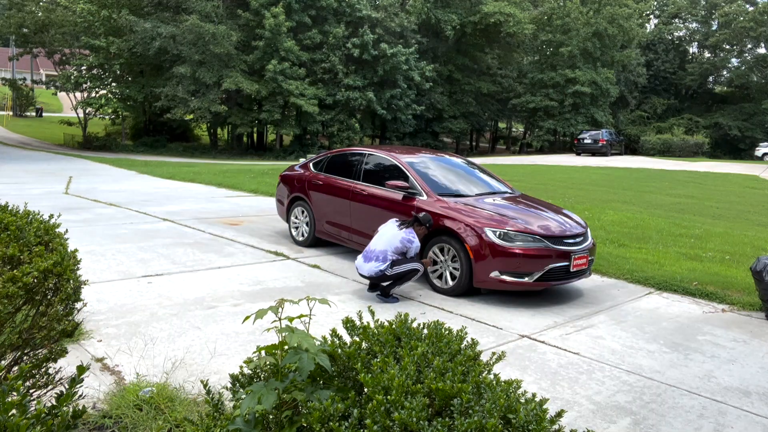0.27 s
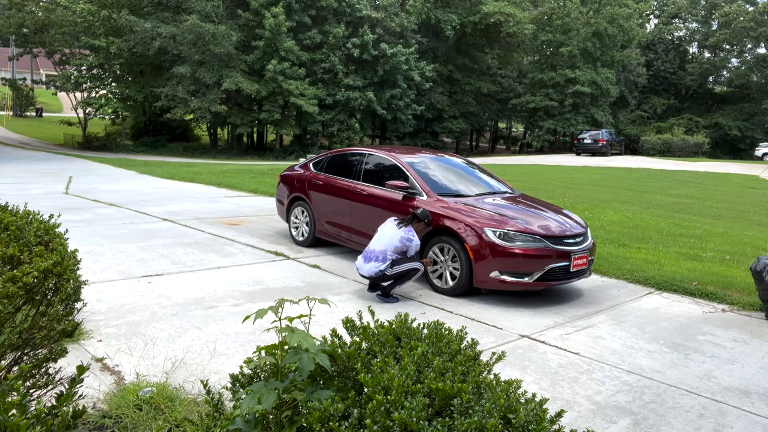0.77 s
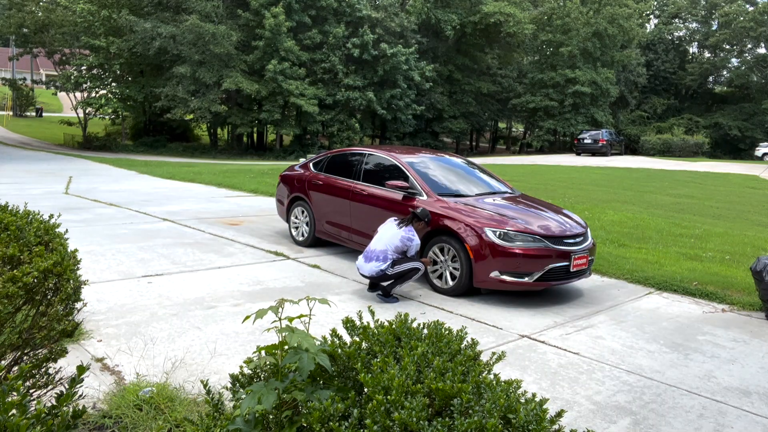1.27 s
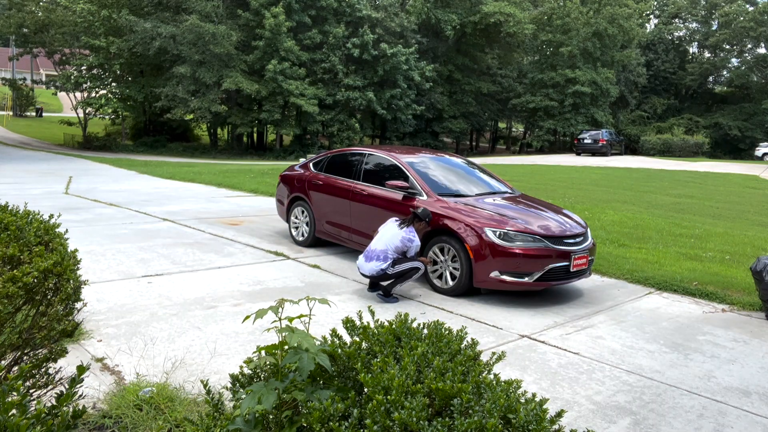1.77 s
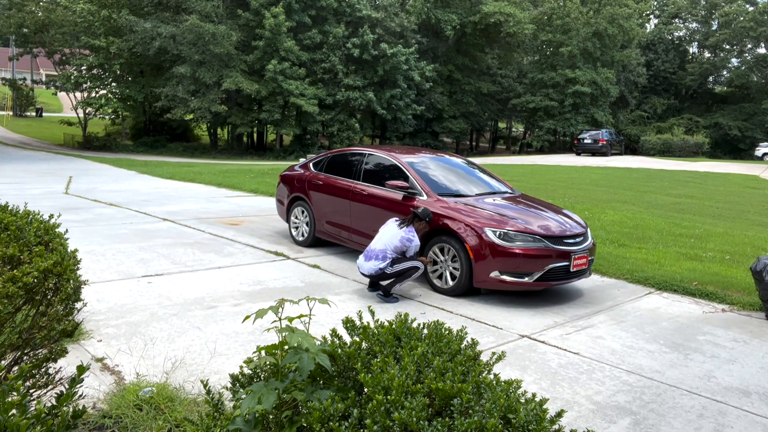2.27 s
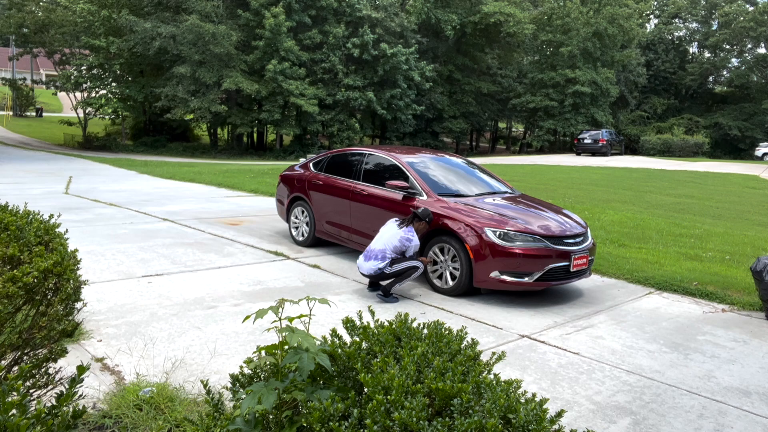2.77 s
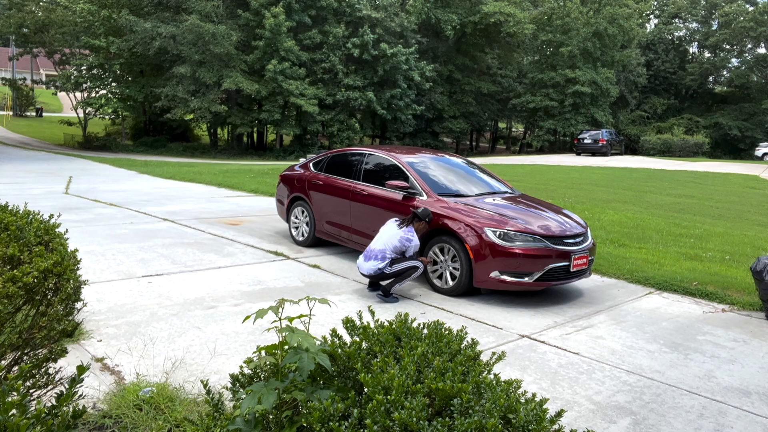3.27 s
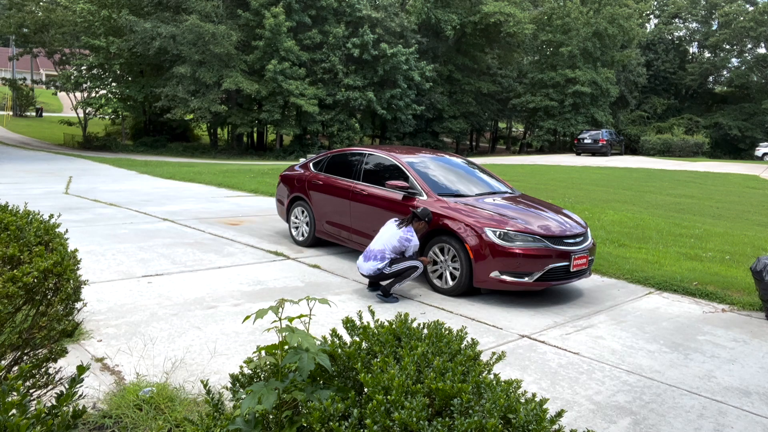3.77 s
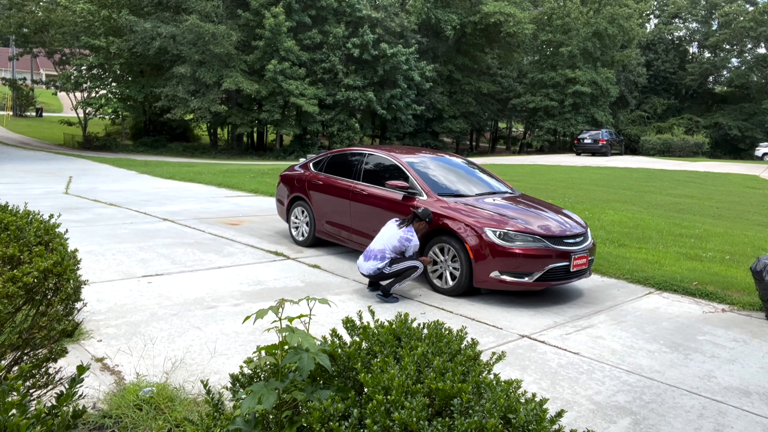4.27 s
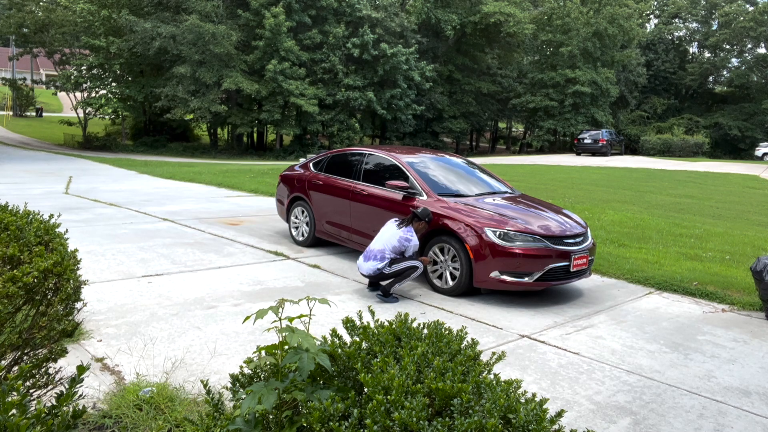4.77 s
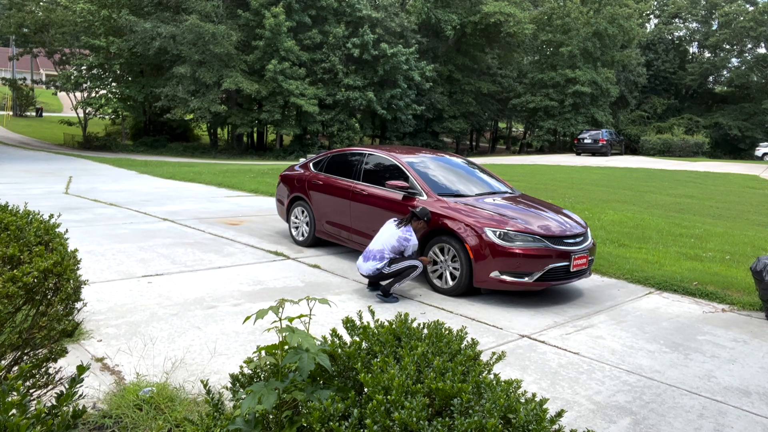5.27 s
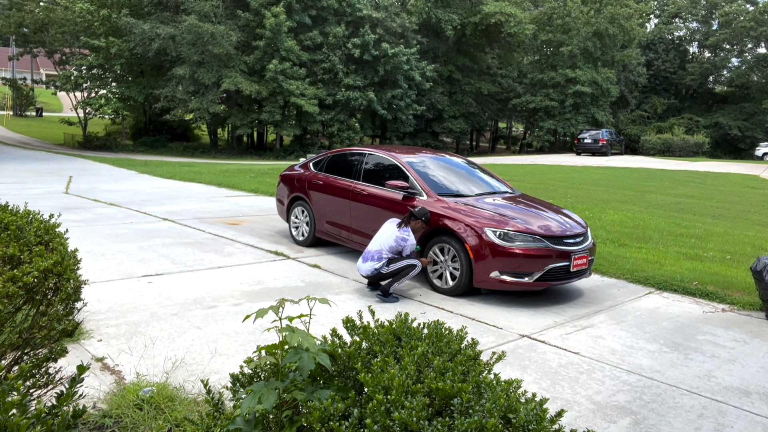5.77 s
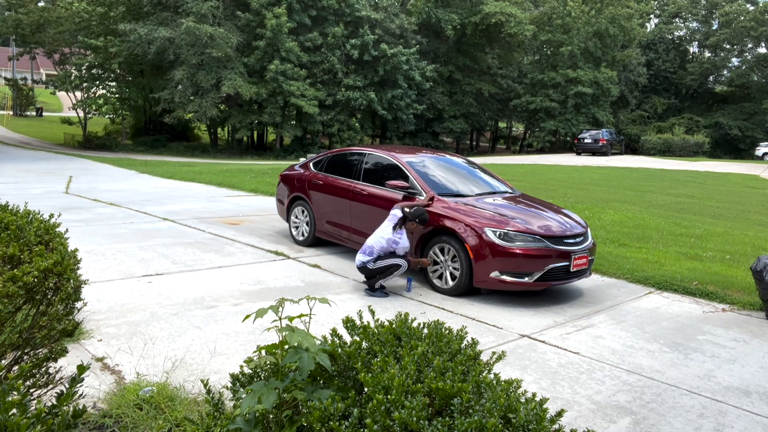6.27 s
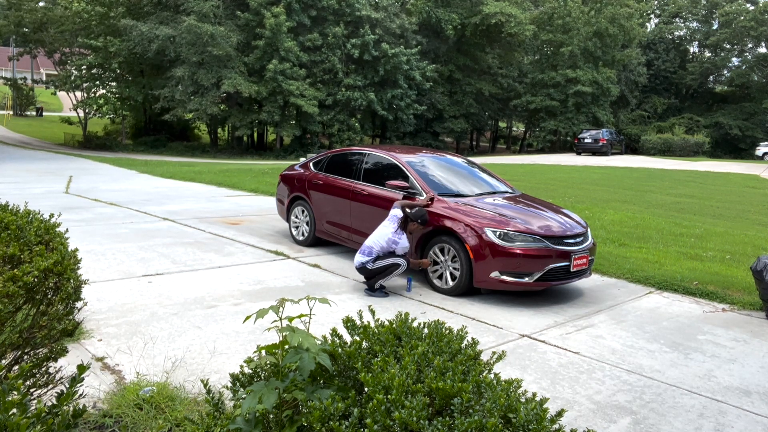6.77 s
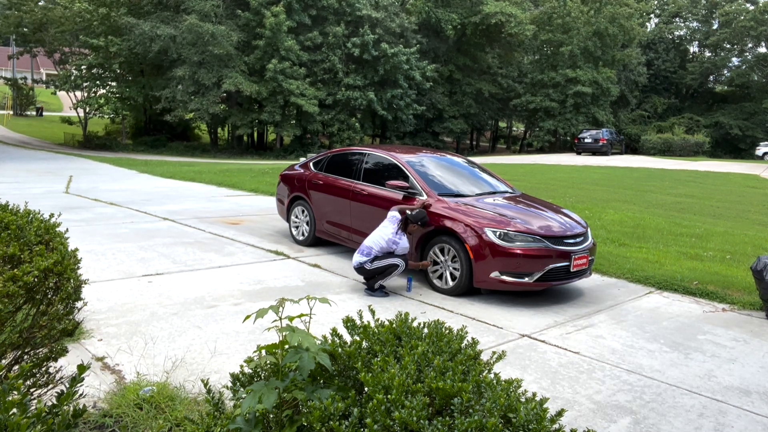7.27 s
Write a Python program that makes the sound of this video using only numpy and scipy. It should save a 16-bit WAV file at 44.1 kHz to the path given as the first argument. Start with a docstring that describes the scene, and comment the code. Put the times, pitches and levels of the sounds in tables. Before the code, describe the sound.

A few small, light knocks rattle on a wheel rim, with faint insect buzz, tiny rapid ticking and a distant low engine drone. Just after one second a tyre valve is pressed and air hisses out, bright and steady, some metres from the microphone. The hiss drops out briefly near six and again after seven seconds, while wind rumble and breathy puffs swell close to the microphone.

```python
"""From the start insects buzz, a camera ticks and a far engine drones (filtered noise, pulses, sines);
a small part rattles on the rim (ringing noise bursts). At 1.2 s the pressed valve pin of a car tyre
lets out a jet of air some metres away: turbulence coloured by wheel and hand. Late on, wind rises in
the leaves and at the camera's two ports, as rumble, roar, buffeting and pressure jumps, beside a breathy
whoosh around 900 Hz; at 6.06 s and 7.25 s the hand slips off the pin and the jet stops for a moment."""
import sys
import numpy as np
from scipy import signal
from scipy.fft import rfft, irfft, next_fast_len
from scipy.io import wavfile
from scipy.ndimage import uniform_filter1d, map_coordinates

SR = 44100
rng = np.random.default_rng(int(sys.argv[2]) if len(sys.argv) > 2 else 0)


def generate_wav(sig):
    """Save sig (samples, or channels by samples) to the path in sys.argv[1] as 16-bit PCM at SR."""
    pcm = np.round(np.clip(np.atleast_2d(sig).T, -1, 1) * 32767).astype(np.int16)
    wavfile.write(sys.argv[1], SR, pcm)


N = 332073
T = np.arange(N) / SR  # time/s

# Spectrum of leaves in the open air: f/Hz, relative level/dB
OUTDOORS = [(250, -28), (350, -9), (600, -4), (1000, -15.5), (2250, -26), (4000, -34.5), (6500, -34.5),
            (9100, -42)]
# Far engine, levels before channel gains: t/s, first order/dB, second order/dB, low tone/dB
ENGINE_ORDERS = [(.3, -68, -70, -90), (.6, -45, -55.5, -58), (1.1, -59.5, -59.5, -56),
                 (2.3, -52.5, -63, -69.5), (3.1, -52, -70, -48), (3.85, -59, -53.5, -55.5),
                 (4.45, -41.5, -52.5, -52.5), (5.1, -48, -58, -52), (5.3, -80, -72, -79)]
# Spectrum of wind rumble: f/Hz, relative level/dB
RUMBLE_SPECTRUM = [(25, -49), (35, -12), (50, -2), (92, 1), (125, -0.5), (200, -9.5), (260, -15.5),
                   (440, -76)]
# Wind before the swells: t/s, rumble level/dB, roar over the rumble/dB
WIND = [(0, -49.5, -8.5), (.8, -45.5, -12.5), (1.35, -49, -9.5), (3.2, -45, -10), (4.2, -46, -10.5),
        (4.8, -42, -7.5), (5.3, -47.5, -10.5), (5.6, -42, -9), (5.9, -39.5, -7.5), (6.1, -42, 0.5),
        (6.3, -43, 0), (6.37, -45, -5), (6.7, -40, -13.5), (7.53, -37, -15)]
# Slow buffeting of the ports: t/s, level/dB
BUFFETING = [(0, -67), (5.25, -68), (6.4, -62), (7, -53), (7.53, -64)]
# Short swells of the rumble and puffs of the whoosh:
# peak t/s, swell of the rumble/dB, whoosh level before flicker/dB
SWELLS = [(6.74, 3.5, -57), (6.93, 6.5, -46.5), (7.095, 1, -56), (7.24, 6, -64), (7.29, -2, -59),
          (7.435, -1, -47.5)]
# Pressure jumps at set times, mostly strong, a few faint: t/s, step level before channel gains/dB
PRESSURE_JUMPS = [(5.236, -38), (5.246, -36), (5.52, -37), (5.703, -37), (5.744, -37), (5.845, -37),
                  (6.321, -38), (6.363, -37), (7.086, -34), (7.153, -35), (5.374, -39), (5.558, -32.5),
                  (5.5987, -33.5), (5.876, -31), (6.0296, -33), (5.715, -33), (5.797, -37), (6.115, -47),
                  (6.1646, -44), (6.2691, -31.5), (6.453, -38), (6.546, -30), (6.5979, -34.5), (6.677, -32),
                  (6.715, -31), (6.768, -29), (6.819, -34), (6.914, -27), (6.947, -33), (7.059, -33),
                  (7.138, -32), (7.283, -30.5), (7.3217, -29.5), (7.363, -33), (7.423, -29)]
# Phase between the ports in the open air: f/Hz, lead of left/rad
PORT_LEAD = [(60, -0.16), (200, 0.15), (300, -1.44), (500, -2.5), (690, -4), (850, -1.9), (1100, 1.5)]
# Balance of the ports in the open air: f/Hz, left minus right level/dB
PORT_BALANCE = [(60, -1), (130, -2.5), (250, -6), (640, 0), (3000, -3)]
# Coherence of the ports in the open air: f/Hz, power share common to both (0-1)
PORT_COMMON = [(60, .9), (200, .93), (300, 0.63), (640, 0.71), (1000, 0.98), (3000, 0.12), (7000, .05)]
# Knocks on the rim: t/s, relative level/dB, main ring f/Hz, second ring f/Hz, decay by 60 dB t/s
KNOCKS = [(0.1138, -38.5, 5300, 3300, 0.1), (0.1723, -45.5, 3990, 3300, 0.14),
          (0.2307, -40, 6680, 2620, 0.14), (0.2687, -50, 4850, 2500, 0.2), (0.298, -51, 4930, 2400, 0.2),
          (0.3235, -56, 4900, 6700, .1), (0.3396, -55, 4870, 2400, 0.12), (0.848, -60, 4000, 2800, .3)]
# Hollows of wheel, hand and ground: f/Hz, width f/Hz,
# level/dB at the first hand position, level/dB at the second
HOLLOWS = [(980, 1220, -19.5, -26.5), (1344, 560, -13, -25.5), (1797, 450, -13, -20), (2480, 545, -9, -12),
           (2980, 150, -13, -17.5), (3597, 650, -5, -15), (4110, 620, -6.5, -13.5), (4700, 400, -12, -6.5),
           (5190, 950, -10.5, -13), (5990, 910, -5, -5), (6567, 520, -5.5, -4.5), (7240, 420, -11, -14),
           (7820, 370, -5.5, -5), (8283, 300, 3, -3), (8780, 820, -7, -3.5), (9710, 780, -6, -7),
           (10640, 860, -7.5, -3.5), (11550, 800, -11, -10), (13000, 1150, -10.5, -13),
           (14050, 520, -9, -8.5), (14850, 400, -18, -7), (15830, 880, -8.5, -5.5)]
# Camera body shading the left port from the jet: f/Hz, left minus right level/dB
BODY_SHADE = [(1200, 1.5), (1800, -3.5), (2500, 0), (3400, -1), (4100, -2), (5300, 1), (6000, -1.5),
              (6600, -12.5), (7100, -8), (8000, -1), (9000, 0)]
# Phase of the jet between the ports: f/Hz, lead of left/rad
JET_LEAD = [(1000, -.5), (1800, -.6), (2400, 0), (3200, -.1), (4000, -.8), (4700, 0), (6400, -3),
            (7600, -8.6), (8500, -8), (15000, -7.7)]
# Coherence of the jet at the ports: f/Hz, power share common to both (0-1)
JET_COMMON = [(1000, 0.26), (2500, 1), (3000, 0.58), (4000, 0.83), (6000, 0.58), (7000, .45), (8300, 0.99),
              (12000, 0.34), (15000, 0.52)]
# Valve pin held down: opens t/s, shuts t/s, level/dB of the brief leak relative to the jet
PRESSES = [(1.2, 6.062, -10), (6.216, 7.245, -25), (7.378, 7.6, -25)]
# Strength of the jet before its overall lift: t/s, level/dB
JET_FLOW = [(1.2, -78), (1.225, -62), (1.28, -54), (1.47, -44.5), (1.5, -42), (1.58, -39), (3.3, -39),
            (3.4, -39.5), (5.52, -40), (5.6, -37.5), (6.04, -38), (6.4, -39), (7.21, -40), (7.245, -46.5),
            (7.38, -41.5), (7.53, -44)]
# Hand at the wheel: t/s, position (0-1), gain of the jet's lower part/dB
HAND = [(1.2, 0.0, -11), (1.55, 0.48, -1), (3.3, 0.06, -4.5), (3.4, 0.83, -1), (5.52, 0.68, 1),
        (6, 0.58, 0), (6.22, 0.5, -6), (6.4, 0.48, -3.5), (7.21, 0.6, 1.5), (7.4, 0.96, -6),
        (7.53, .7, 3.5)]


def amp(db):
    """A level in dB is twenty times the logarithm of amplitude."""
    return 10 ** (np.asarray(db) / 20)


def unit(x):
    """Division by the root mean square gives unit effective value."""
    return x / np.sqrt(np.mean(x ** 2) + 1e-20)


def along(points, hz):
    """Linear interpolation of (f/Hz, value) points over logarithmic frequency."""
    f, v = np.transpose(points)
    return np.interp(np.log(hz + 1), np.log(f + 1), v)


def curves(rows):
    """Linear interpolation in time of each column after t/s."""
    s, *cols = np.transpose(rows)
    return [np.interp(T, s, c) for c in cols]


def wobble(rate):
    """Slow random modulation: a spline through rate random knots per second."""
    knots = rng.standard_normal(int(N * rate / SR) + 4)
    return map_coordinates(knots, [T * rate])


def filtered(x, response):
    """Linear filtering: the spectrum is multiplied by a frequency response."""
    m = next_fast_len(N + 4096, True)
    return irfft(rfft(x, m) * response(np.fft.rfftfreq(m, 1 / SR)), m)[..., :N]


def peak(hz, centre_hz, width_hz):
    """Response of a damped resonator, causal and of unit height."""
    damping = 1j * hz * width_hz
    return damping / (centre_hz ** 2 - hz ** 2 + damping)


def turbulence(patchy_db):
    """Turbulent intermittency: three independent noises share patches of random gain."""
    z = signal.stft(rng.standard_normal((3, N)), nperseg=512)[2]
    patches = rng.standard_normal(z.shape[1:])
    patches = uniform_filter1d(patches, size=8, axis=0)  # over frequency
    patches = uniform_filter1d(patches, size=12, axis=1)  # over time
    return signal.istft(z * amp(patchy_db * unit(patches)), nperseg=512)[1][:, :N]


def ports(noise, common, lead, balance, colour):
    """Partial coherence: each port takes a common noise and one of its own; the pair has rms 1."""
    m = next_fast_len(N, True)
    hz, z = np.fft.rfftfreq(m, 1 / SR), rfft(noise, m)
    side = np.array([[.5], [-.5]])  # left, right
    share = np.clip(along(common, hz), 0, 1)
    shared = np.sqrt(share) * np.exp(1j * side * along(lead, hz)) * z[0]
    pair = shared + np.sqrt(1 - share) * z[1:]
    return unit(irfft(pair * amp(side * along(balance, hz)) * colour(hz), m)[:, :N])


def near(colour, patchy_db):
    """Partial coherence of open-air noise at the two ports."""
    return ports(turbulence(patchy_db), PORT_COMMON, PORT_LEAD, PORT_BALANCE, colour)


def leaves():
    """Wind-excited foliage: broadband rustle whose level follows the buffeting."""
    rustle = near(lambda hz: amp(along(OUTDOORS, hz)) * (hz < 9500), patchy_db=1.0)
    return amp(-62.5 + 0.29 * (curves(BUFFETING)[0] + 73.0)) * rustle


def insects():
    """Amplitude modulation: noise in two high bands pulses about 72 times a second."""
    def song(hz):
        upper = peak(hz, 10680, 350) ** 2 + amp(-7) * peak(hz, 10540, 900) ** 2
        lower = amp(-16) * peak(hz, 7600, 600) ** 2
        return (upper + lower) * (hz < 11000)

    pulse = 1 + .5 * np.sin(2 * np.pi * 72.1 * T + .8 * wobble(3))
    buzz = unit(filtered(rng.standard_normal((2, N)), song))
    return amp(-73.5 + 0.73 * wobble(5.0)) * pulse * buzz


def camera_ticks():
    """Impulse excitation of a resonator: strong and weak ticks alternate, thirty pairs a second."""
    tick_hz = 1715
    beat = np.arange(.012, T[-1], 1 / 60)
    weaker_db = np.where(np.arange(len(beat)) % 2, -8, 0)
    pulses = np.zeros(N)
    pulses[(beat * SR).astype(int)] = amp(weaker_db + 2.5 * rng.standard_normal(len(beat)))
    return amp(-26.5) * filtered(pulses, lambda hz: peak(hz, tick_hz, 220) * peak(hz, tick_hz, 380))


def engine():
    """Periodic excitation: two orders and a low tone of a slowing engine, unsteady in pitch and level."""
    hz = 105.6 - 2.95 * T  # falls by 2.95 Hz per second
    first_db, second_db, hum_db = curves(ENGINE_ORDERS)
    turn = 2 * np.pi * np.cumsum(hz * (1 + 0.01177 * wobble(12))) / SR
    first = amp(first_db + 2.44 * wobble(10)) * np.sin(turn)
    second = amp(second_db + 2.2 * wobble(6.6)) * np.sin(2 * turn)
    hum_turn = 2 * np.pi * np.cumsum(1.645 * hz * (1 + 0.012 * wobble(12))) / SR
    hum = amp(hum_db + 1.5 * wobble(5.6)) * np.sin(hum_turn)
    return (first + second + hum) * amp([[1.5], [4.5]])  # left, right gain/dB


def whoosh():
    """Band-limited noise: a breathy whoosh around 900 Hz, steady with short puffs."""
    from_s, rise_s, steady_db, puff_s = 6.63, .12, -53.5, 0.04

    def band(hz):
        return abs(peak(hz, 900, 640)) ** 2 + amp(-17) * abs(peak(hz, 1400, 1200)) ** 2

    puffs = sum(amp(db) * np.exp(-((T - s) / puff_s) ** 2) for s, _, db in SWELLS)
    steady = amp(steady_db) * np.clip((T - from_s) / rise_s, 0, 1)
    return (steady + puffs) * amp(2.3 * wobble(35)) * near(band, patchy_db=1.1)


def pressure_jumps(rumble):
    """Exponential relaxation: sudden steps leak away, opposing the rumble at the right port."""
    from_s, level_db, spread_db, leak_s = 5.3, -44.5, 5, 0.0023
    scattered = [(from_s + u * (T[-1] - from_s), level_db + spread_db * (2 * v - 1))
                 for u, v in rng.random(size=(12, 2))]  # further jumps at random times
    jumps = np.zeros(N)
    for s, db in [*PRESSURE_JUMPS, *scattered]:
        at = round(s * SR)
        jumps[at] = -np.sign(rumble[1, at]) * amp(db)
    steps = signal.lfilter([1], [1, -np.exp(-1 / (leak_s * SR))], jumps)
    return steps * amp([[-2.5], [1.8]])  # left, right gain/dB


def wind():
    """Turbulent pressure at the ports: rumble, roar and buffeting, with sudden jumps."""
    rumble_db, roar_db = curves(WIND)
    swell_s = .05
    swell_db = sum(db * np.exp(-((T - s) / swell_s) ** 2) for s, db, _ in SWELLS)
    rumble = near(lambda hz: amp(along(RUMBLE_SPECTRUM, hz)), patchy_db=0.9)
    rumble = amp(rumble_db + swell_db) * rumble
    roar = near(lambda hz: peak(hz, 236, 240) ** 2 / (1 + (hz / 450) ** 4), patchy_db=1.5)
    roar = amp(rumble_db + roar_db + 1.2 * swell_db) * roar  # swells more than the rumble
    buffet = amp(*curves(BUFFETING)) * near(lambda hz: peak(hz, 25, 30) ** 2, patchy_db=1.4)
    return rumble + roar + buffet + pressure_jumps(rumble)


def rattle():
    """Impact excitation: each knock is a crack, two brief rings and a dying scatter of echoes."""
    out, t = np.zeros((2, N + SR)), T[:SR // 4]
    for s, db, hz, second_hz, t60 in KNOCKS:
        burst = amp(-60 * t / .012) + amp(-15 - 60 * t / t60)  # crack, then echoes
        onset = 1 - np.exp(-t / 0.0014)
        crack = burst * onset * rng.standard_normal((2, len(t)))
        main_ring, second_ring = (signal.lfilter(*signal.iirpeak(f, Q=7, fs=SR), crack)
                                  for f in (hz, second_hz))
        knock = .8 * crack + 1.9 * main_ring + 1.2 * second_ring
        out[:, round(s * SR):][:, :len(t)] += amp(db + 3.5) * knock
    return filtered(out[:, :N], lambda hz: peak(hz, 3600, 7000) ** 2 / (1 + (hz / 9000) ** 8))


def hollows(column):
    """Power sum of cavity resonances for one hand position, combed by bounces off car body and ground."""
    grid = np.arange(0, SR / 2, 10)
    power = sum(amp(2 * row[column]) * abs(peak(grid, *row[:2])) ** 4 for row in HOLLOWS)
    # weak bounces, each with a delay/ms and a level/dB
    bounces = [(22 * u, -23 - 10 * u) for u in rng.uniform(.1, 1, size=24)]
    comb = abs(1 + sum(amp(db) * np.exp(-2j * np.pi * grid * ms / 1000) for ms, db in bounces))
    gain = np.sqrt(power) * comb
    return lambda hz: np.interp(hz, grid, gain)


def valve():
    """Gating of the flow: the jet dies fast at each shut, a weak leak and a slow dull tail remain."""
    shut_t60_s, leak_s, tail_t60_s = 0.025, 0.012, 1.8
    tail_db = -22  # under the jet
    held, tail = np.zeros((2, N))

    def dying(s):
        return amp(-60 * np.clip(T - s, 0, None) / shut_t60_s)

    for start, stop, leak_db in PRESSES:
        leak = amp(leak_db) * dying(stop + leak_s)
        held += (T >= start) * np.maximum(dying(stop), leak)
        jet_db = np.interp(stop, *np.transpose(JET_FLOW))
        tail += (T > stop) * amp(tail_db + jet_db - 60 * (T - stop) / tail_t60_s)
    return held, tail


def jet():
    """Jet noise: turbulent outflow excites the hollows of wheel and hand; the hand shifts their strengths."""
    held, tail = valve()
    flow = held * amp(*curves(JET_FLOW))
    hand, low_db = curves(HAND)
    hand = np.clip(hand, 0, 1)
    eddies = turbulence(patchy_db=0.8)
    first, second = (ports(eddies, JET_COMMON, JET_LEAD, BODY_SHADE, hollows(column))
                     for column in (2, 3))
    hiss = (1 - hand) * first + hand * second
    low = filtered(hiss, lambda hz: 1 / (1 + (hz / 3000) ** 4))
    hiss = hiss + (amp(low_db) - 1) * low

    # a thin high leak from the first touch of the pin until the first shut
    seep_hz, first_shut_s = 6700, PRESSES[0][1]
    touch = np.clip((T - 1.13) / 0.054, 0, 1) * (T < first_shut_s)
    seep = unit(filtered(hiss, lambda hz: peak(hz, seep_hz, 900) + amp(-12) * (hz > seep_hz)))
    seep = amp(-68.5) * touch * seep

    # a mid-band rush that sets in at once as the pin gives, until the first shut
    spit = unit(filtered(hiss, lambda hz: peak(hz, 4000, 2600) ** 2))
    spit = amp(-66) * (T > 1.222) * (T < first_shut_s) * spit

    # a dull hiss lingers after each shut, dying slowly
    dull = unit(filtered(hiss, lambda hz: (hz < 9500) / (1 + (hz / 2800) ** 2)))
    flicker = amp(2.5 + 0.15 * wobble(9.8) + 0.78 * wobble(40))  # with an overall lift of 2.5 dB
    return flicker * flow * hiss + tail * dull + seep + spit


def scene():
    """Superposition: the sound pressures of all sources add."""
    return leaves() + insects() + camera_ticks() + engine() + whoosh() + wind() + rattle() + jet()


def record(dry):
    """Band limitation: the camera keeps nothing above its top frequency."""
    top_hz = 15790
    return filtered(dry, lambda hz: np.clip((top_hz - hz) / 80, 0, 1) ** 2)


dry = scene()
out = record(dry)
generate_wav(out)
```